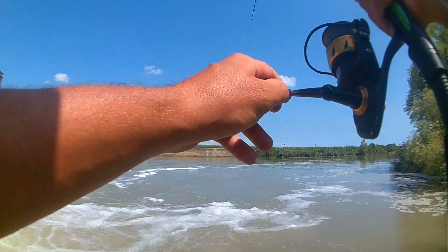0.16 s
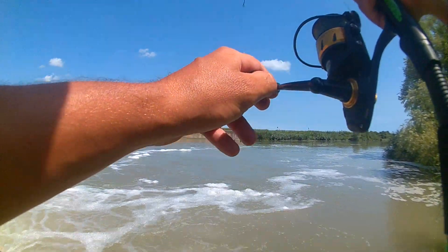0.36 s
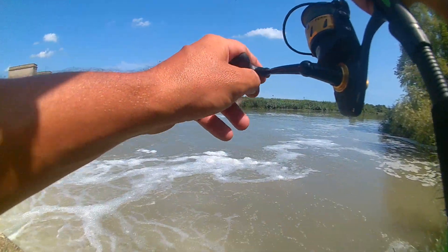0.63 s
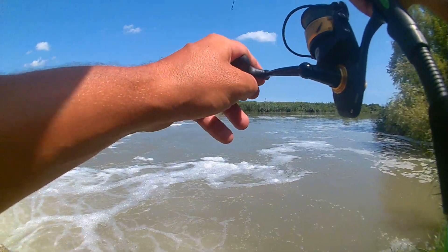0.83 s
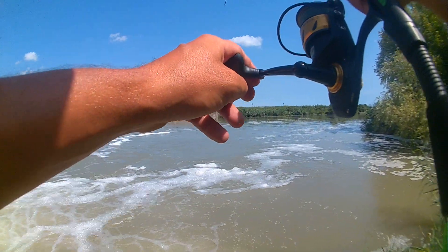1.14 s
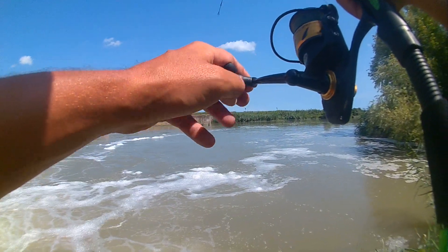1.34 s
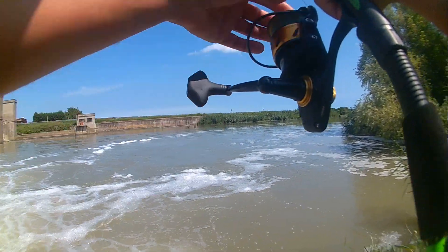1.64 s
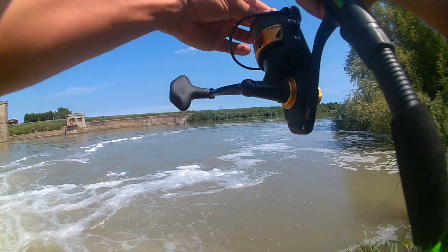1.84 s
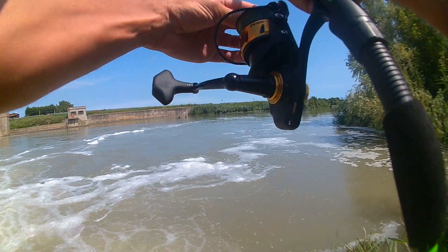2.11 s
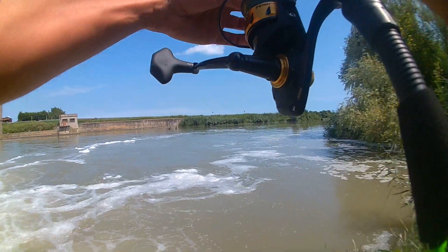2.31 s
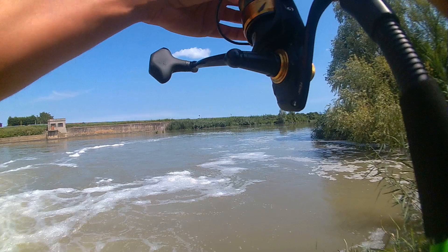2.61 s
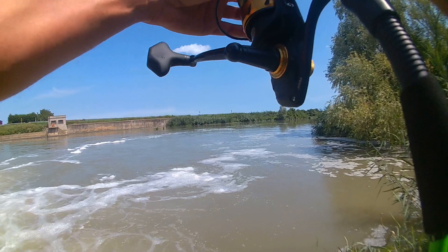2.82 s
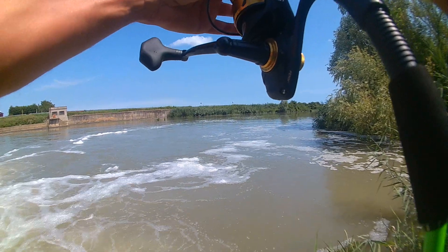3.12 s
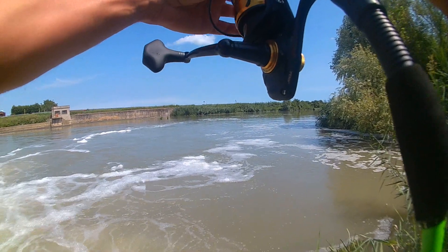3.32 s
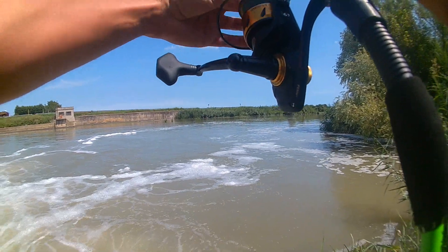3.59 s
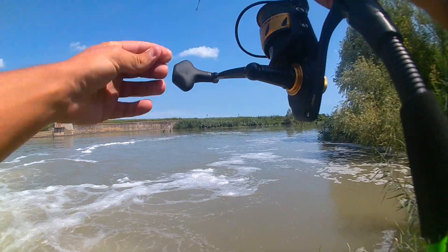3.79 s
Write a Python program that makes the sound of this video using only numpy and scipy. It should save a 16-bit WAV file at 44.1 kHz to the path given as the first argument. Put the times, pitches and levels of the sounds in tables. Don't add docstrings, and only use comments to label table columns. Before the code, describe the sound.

A fishing reel's drag ratchet buzzes in two runs with hollow rattling knocks over rushing river water.

```python
import sys
import numpy as np
from scipy import signal
from scipy.fft import rfft, irfft
from scipy.io import wavfile
from scipy.ndimage import uniform_filter1d

SR = 44100
rng = np.random.default_rng(int(sys.argv[2]) if len(sys.argv) > 2 else 0)


def undo_db(level):
    steps = np.asarray(level, float) / 20
    return 10 ** steps


def unload_audio(sound):
    columns = np.transpose(np.atleast_2d(sound))
    steps = np.round(np.clip(columns, -1, 1) * 32767)
    wavfile.write(sys.argv[1], SR, steps.astype(np.int16))


N = 174195

# (time [s], ratchet rate [teeth/s], tick level [dB])
FIRST_RUN = [
    (.314, 90, 0),
    (.39, 230, 0),
    (.6, 115, -2),
    (.7, 350, 3.5),
    (1.0, 245, -2.5),
    (1.12, 470, 3),
    (1.55, 270, 1),
    (1.65, 300, 1),
    (1.984, 77, -2),
]
# (time [s], ratchet rate [teeth/s], tick level [dB])
SECOND_RUN = [
    (2.373, 69.2, 0.12),
    (2.45, 333.3, -1),
    (2.55, 389.2, 0.46),
    (2.75, 125.7, -0.21),
    (3.5, 118.2, -0.96),
    (3.65, 278.5, -0.56),
    (3.72, 162.2, -1.2),
    (3.96, 157.4, 0.31),
]
# (time [s], level [dB])
LONE_TICKS = [
    (.007, 1),
    (0.025, 1),
    (0.050, 0),
    (.084, 1),
    (.153, -8),
    (.168, -1),
    (.185, -3),
    (0.299, -3),
    (2.346, 1),
    (2.369, 1),
]
# (frequency [Hz], level [dB], t60 [s], phase in the throb [turns])
SPRING_MODES = [(2553, 10, 0.0094, 0.08), (3250, -11.5, 0.0094, 0.37), (3500, -7, 0.011, 0.64),
                (3770, -6.5, 0.016, .55), (4085, -4.5, 0.0088, 0.041), (4210, -2, 0.0088, 0.083),
                (7880, -18.5, 0.019, 0.34), (8400, -18.5, 0.013, 0.24), (9200, -17.5, 0.012, 0.77),
                (9900, -11, 0.011, .2), (10030, -17, 0.012, .3), (11300, -14, 0.0054, 0.73),
                (12300, -25, .004, .4)]
# (time [s], level [dB])
REEL_LOAD = [(.3, -52.5), (.58, -50.5), (.7, -36), (.82, -29.5), (.93, -38), (1.12, -43), (1.2, -28),
             (1.33, -36), (1.42, -40.5), (1.74, -40), (1.93, -45), (2.35, -45), (2.46, -30), (2.6, -36.5),
             (2.8, -49.5), (3.56, -46.5), (3.66, -33.5), (3.74, -44)]
# (time [s], peak [dB], thin edge below the peak [dB])
HARD_KNOCKS = [(0.695, -29.5, -27.5), (0.7078, -26.5, -34), (0.757, -25.5, -37.5), (0.7637, -27.5, -36),
               (0.7863, -19, -36.5), (0.8069, -17, -34), (0.8199, -18.5, -39), (0.8314, -16, -38),
               (0.8426, -29.5, -36), (0.8561, -19.5, -38), (0.869, -26, -28.5), (0.9264, -24, -34),
               (0.9628, -34.5, -31), (1.0041, -30.5, -35.5), (1.1605, -31, -27), (1.1884, -14, -39),
               (1.1982, -25, -26), (1.2119, -32, -31), (1.2255, -18, -34), (1.2449, -20, -37),
               (1.2713, -14, -40), (1.2855, -20, -40), (1.3543, -28, -44), (1.367, -22, -41.5),
               (1.4067, -28, -30), (1.5392, -21, -39), (1.7546, -22, -41), (1.8068, -23, -36.5),
               (1.8348, -18.5, -42), (1.8656, -15, -42.5), (1.8967, -29.5, -36), (1.916, -19.5, -43),
               (2.3487, -18, -44), (2.3915, -18, -43), (2.4137, -31, -39), (2.4247, -30, -27),
               (2.444, -23, -27.5), (2.478, -23, -26), (2.502, -21, -31), (2.5432, -32, -37),
               (2.5566, -17, -42), (3.1794, -23, -42), (3.2174, -27.5, -31), (3.26, -44.5, -36),
               (3.296, -21, -40), (3.3505, -20.5, -37), (3.3813, -20, -34.5), (3.4202, -24, -44),
               (3.4335, -22, -43), (3.4496, -21, -40), (3.4604, -23, -42), (3.5029, -19.5, -47),
               (3.5218, -15.5, -44), (3.5618, -18, -41), (3.5936, -29.5, -47), (3.6055, -27, -36),
               (3.6242, -16, -40.5), (3.715, -24, -42), (3.7583, -19, -43), (3.887, -45, -33.5)]
# (frequency [Hz], level [dB], t60 [s])
BODY_MODES = [(1100, -7.5, 0.023), (1481, -0.5, 0.011), (1573, 2.5, 0.025), (1679, 0, 0.018),
              (1870, -10.5, 0.0097)]
# (frequency [Hz], level [dB], t60 [s])
EDGE_MODES = [(2110, -25, 0.018), (2617, -18.5, .015), (3010, -19.5, 0.0058), (3480, -28, 0.0079),
              (4140, -35, 0.004), (4950, -41.5, 0.0038), (6200, -32.5, 0.0046), (8350, -49.5, .003),
              (9300, -49.5, .003), (10800, -48, .003), (11900, -46.5, 0.0038), (12500, -49.5, .003),
              (13500, -55.5, .002)]
# (frequency [Hz], density [dB per Hz])
RIVER_COLOUR = [(30, -61), (156, -26.5), (386, -7.5), (973, -7), (1280, -7.5), (1500, -23.5), (2000, -39.5),
                (3000, -52), (4500, -73)]
# (frequency [Hz], width [Hz], gain [dB])
CASE_MODES = [(480, 200, 2.5), (1017, 370, 6), (1130, 360, 0.5)]
# (time [s], level [dB])
WEIR_SURGE = [(0, -28.5), (.17, -26), (.3, -29), (.5, -27.5), (1.0, -27.5), (1.5, -28.5), (1.95, -28.5),
              (2.2, -33.5), (2.45, -28.5), (2.85, -29), (3.3, -29), (3.65, -27.5), (3.95, -29.5)]
# (time [s], gain [dB])
ARM_SHADE = [
    (0, 0),
    (.24, -3),
    (.4, 0.5),
]

TICK_DB, TICK_SCATTER_DB, TOOTH_JITTER_S = -62, 2.5, .00015
TEETH_PER_BEAT, BEAT_DB = 9.3, 3.3
PATCHY_DB, PATCHES_PER_S = 3, 40
NOD_HZ, NOD_TEETH_PER_S, NOD_PEAK_S, NOD_FROM_S = 5.9, 15, 3.07, 2.75
RATTLES_PER_S, RATTLE_SCATTER_DB, RATTLE_DB, FULL_LOAD_DB = 1100, 2.5, -1, -33
FIRST_RUN_END_S = 1.935
KNOCK_DB, KNOCK_EDGE_DB, CHATTER_EDGE_DB = -7, 27, -6
BODY_TOP_HZ = 1820
RIVER_DB, SWELL_DB, FLICKER_DB = -30.5, .3, .7
BUBBLES_PER_S, BUBBLE_DB = 3000, -7
SHADE_HZ = 1350
CASE_GAP_HZ, GAP_LEAK_DB, HISS_DB = (4750, 7400), -19, -100
FADE_S = .001


def level(x, db):
    return x * undo_db(db) / np.sqrt(np.mean(x ** 2))


def curve(table, col, **out):
    rows = np.array(table, float)
    return np.interp(np.arange(N) / SR, rows[:, 0], rows[:, col], **out)


def walk(rate_hz):
    k = int(SR / rate_hz)
    held = np.repeat(rng.standard_normal(N // k + 2), k)[:N + k]
    return 1.03 * uniform_filter1d(uniform_filter1d(held, k), k)[:N]


def ring(x, modes, rise_s=.00066):
    t = np.arange(4096) / SR
    h = np.zeros(len(t))
    for hz, db, t60 in modes:
        h += undo_db(db) * np.sin(2 * np.pi * hz * t) * np.exp(-np.log(1000) * t / t60)
    return signal.fftconvolve(x, h * (1 - np.exp(-t / rise_s)))[:N]


def strikes(times_s, db):
    x = np.zeros(N)
    at = np.clip((np.asarray(times_s) * SR).astype(int), 0, N - 1)
    np.add.at(x, at, undo_db(np.asarray(db)))
    return x


def ratchet():
    t = np.arange(N) / SR
    rate = curve(FIRST_RUN, 1, left=0, right=0) + curve(SECOND_RUN, 1, left=0, right=0)
    nod = NOD_TEETH_PER_S * np.cos(2 * np.pi * NOD_HZ * (t - NOD_PEAK_S))
    rate = rate + (t > NOD_FROM_S) * nod
    teeth = np.cumsum(rate) / SR + .95
    at = np.flatnonzero(np.diff(np.floor(teeth)))
    scatter = TICK_SCATTER_DB * rng.standard_normal((len(at), len(SPRING_MODES)))
    times_s = t[at] + TOOTH_JITTER_S * rng.standard_normal(len(at))
    force_db = curve(FIRST_RUN, 2, right=0) + curve(SECOND_RUN, 2, left=0)
    lone = np.array(LONE_TICKS)
    lone_hits = strikes(lone[:, 0], lone[:, 1])
    out = np.zeros(N)
    for k, (hz, db, t60, turn) in enumerate(SPRING_MODES):
        beat = BEAT_DB * np.sin(2 * np.pi * (teeth[at] / TEETH_PER_BEAT + turn))
        patchy = PATCHY_DB * walk(PATCHES_PER_S)[at]
        hits = strikes(times_s, force_db[at] + beat + scatter[:, k] + patchy)
        out += ring(hits + lone_hits, [(hz, db, t60)])
    return undo_db(TICK_DB) * out


def rattle():
    chance = rng.random((3, N))
    load_db = curve(REEL_LOAD, 1)
    rate = RATTLES_PER_S * np.clip(undo_db(load_db - FULL_LOAD_DB), .3, 1) ** 1.5
    force = undo_db(-RATTLE_SCATTER_DB * np.log(np.clip(chance[2], .03, 1)))
    hits = (chance[0] < rate / SR) * np.sign(chance[1] - .5) * force / np.sqrt(rate)
    first = curve(FIRST_RUN, 1, left=0, right=0) * (np.arange(N) < FIRST_RUN_END_S * SR)
    pulling = first + curve(SECOND_RUN, 1, left=0, right=0) > 0
    loaded = hits * undo_db(load_db + RATTLE_DB) * pulling
    chatter = knock(loaded, loaded * undo_db(CHATTER_EDGE_DB)) / np.std(knock(hits, hits))
    times_s, peak_db, edge_db = np.array(HARD_KNOCKS).T
    body = strikes(times_s, peak_db + KNOCK_DB)
    edge = strikes(times_s, peak_db + edge_db + KNOCK_EDGE_DB)
    return chatter + knock(body, edge)


def knock(body, edge):
    dull = signal.butter(6, BODY_TOP_HZ, fs=SR, output="sos")
    return signal.sosfilt(dull, ring(body, BODY_MODES)) + ring(edge, EDGE_MODES, rise_s=.000084)


def river():
    f = np.maximum(np.fft.rfftfreq(N, 1 / SR), 1)
    rows = np.array(RIVER_COLOUR, float)
    colour = undo_db(np.interp(np.log(f), np.log(rows[:, 0]), rows[:, 1], right=-90))
    for hz, width, db in CASE_MODES:
        colour = colour * undo_db(db / (1 + (2 * (f - hz) / width) ** 2))
    swell_db, shade_db = SWELL_DB * walk(0.59), curve(ARM_SHADE, 1)
    out = np.zeros(N)
    for hz in 30 * 2 ** np.arange(0, 7.6, 1 / 3):
        chance = rng.random((2, N))
        bubbles = (chance[0] < BUBBLES_PER_S / 20 / SR) * (2 * chance[1] - 1)
        foam = rng.standard_normal(N) + level(bubbles, BUBBLE_DB)
        band = np.cos(np.clip(3 * np.log2(f / hz), -1, 1) * np.pi / 2)
        gain_db = swell_db + FLICKER_DB * walk(9) + (hz > SHADE_HZ) * shade_db
        out += irfft(rfft(foam) * band * colour, N) * undo_db(gain_db)
    surge_db = curve(WEIR_SURGE, 1)
    return level(out, RIVER_DB) * undo_db(surge_db - surge_db[int(2.17 * SR)])


def scene():
    return (ratchet() + rattle() + river())[None]


def roll_off(x):
    return signal.sosfilt(signal.butter(12, 15550, fs=SR, output="sos"), x)


def record(dry):
    dry = np.pad(dry, ((0, 0), (2000, 0)), "wrap")
    gap = signal.ellip(5, .5, 50, CASE_GAP_HZ, "bandstop", fs=SR, output="sos")
    heard = signal.sosfilt(gap, dry) + undo_db(GAP_LEAK_DB) * dry
    heard = heard + undo_db(HISS_DB) * rng.standard_normal(dry.shape)
    bass_cut = signal.butter(2, 60, "high", fs=SR, output="sos")
    heard = signal.sosfilt(bass_cut, heard)[:, -N:]
    left_s = np.arange(N)[::-1] / SR
    heard = heard * np.sin(np.pi / 2 * np.clip(left_s / FADE_S, 0, 1)) ** 2
    return roll_off(heard)


dry = scene()
out = record(dry)
unload_audio(out)
```